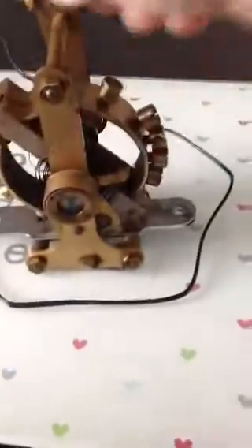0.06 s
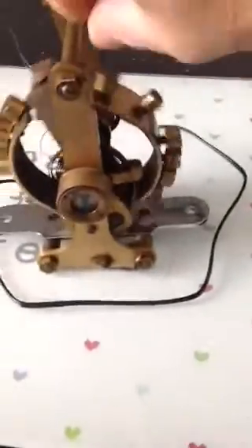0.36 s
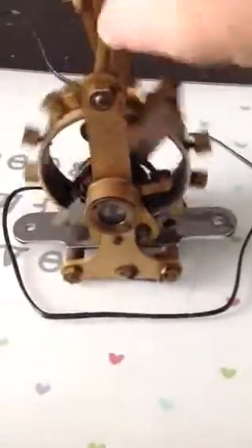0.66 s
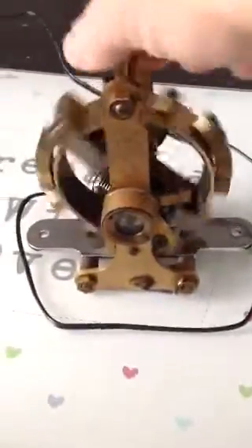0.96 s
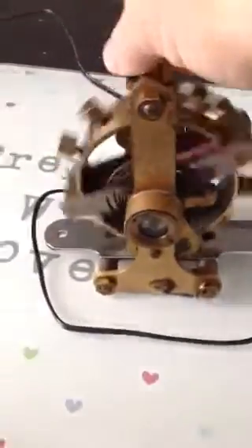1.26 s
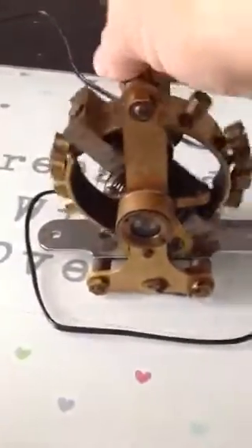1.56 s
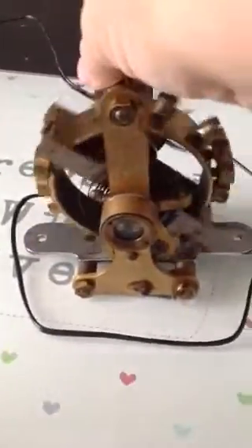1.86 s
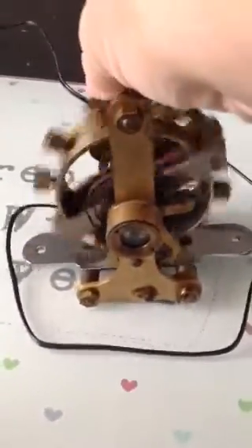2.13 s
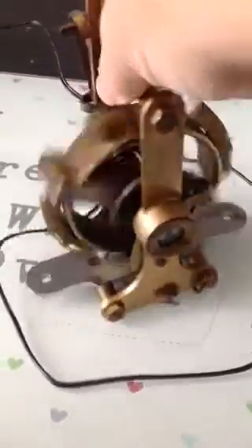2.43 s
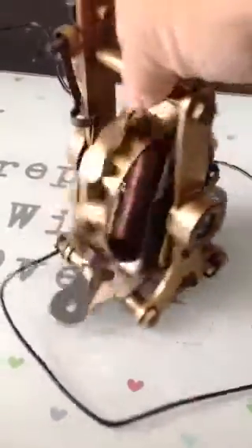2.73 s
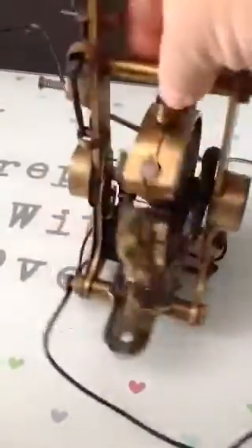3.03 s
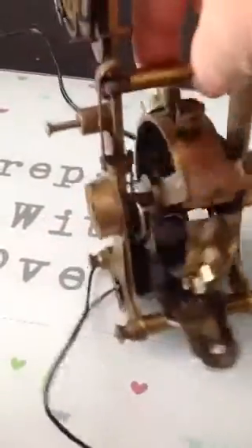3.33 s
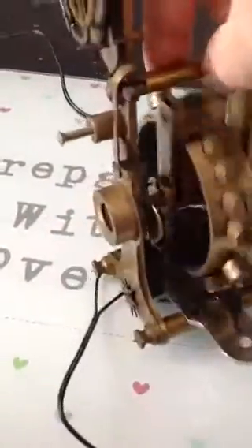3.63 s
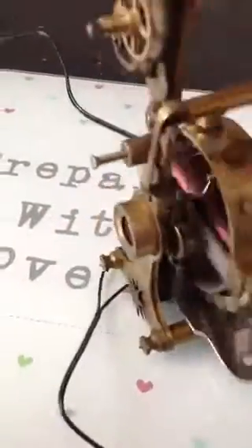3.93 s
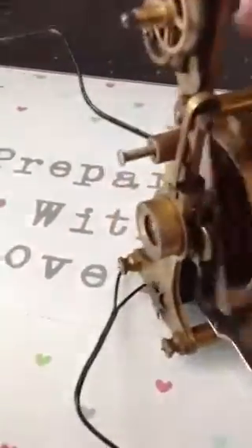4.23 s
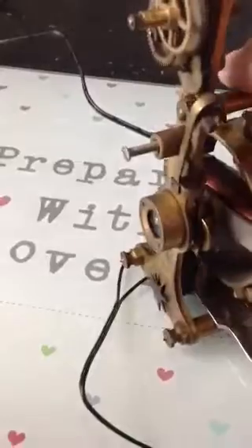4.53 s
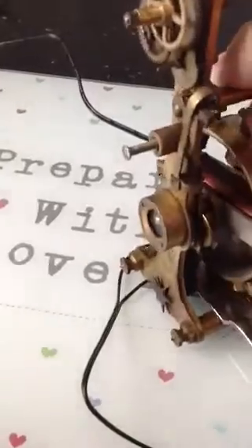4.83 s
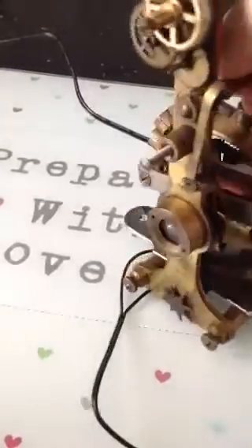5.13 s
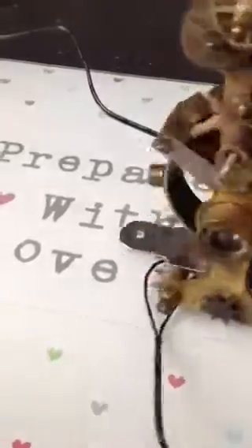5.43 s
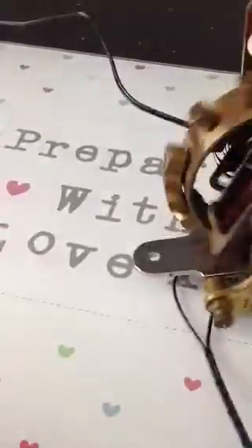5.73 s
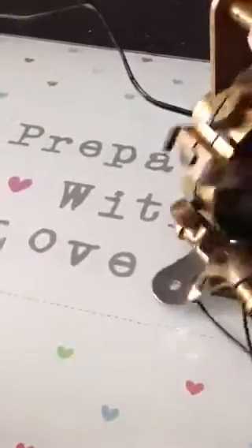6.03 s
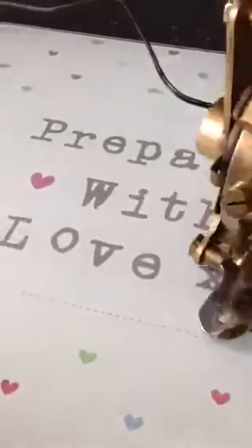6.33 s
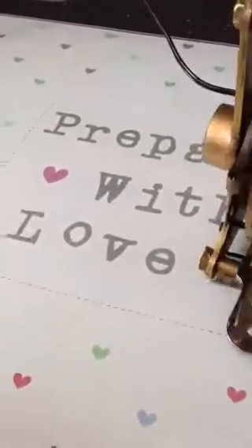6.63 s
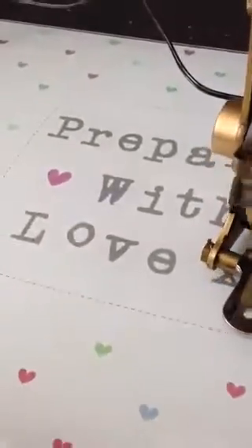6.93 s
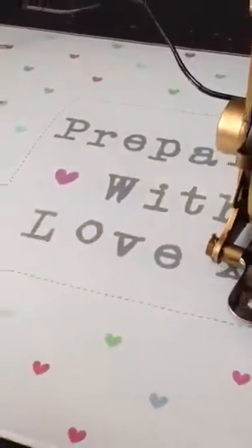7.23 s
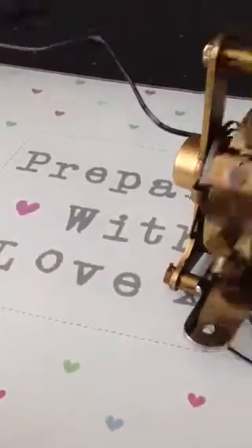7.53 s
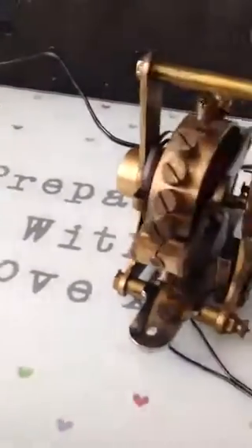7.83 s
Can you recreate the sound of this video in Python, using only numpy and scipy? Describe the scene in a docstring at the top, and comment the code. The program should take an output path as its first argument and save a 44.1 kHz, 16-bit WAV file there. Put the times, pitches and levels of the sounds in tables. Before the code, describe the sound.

Close to the microphone, a hand rocks and turns a brass clockwork, its feet knocking on the tabletop and its wheel striking the stops. The irregular knocks ring briefly and shake small loose parts, with soft ticks and faint rubbing between them. The loudest blow comes midway, then a rattling cluster, a short scrape and a last solid knock. A small room adds a slight echo and quiet hiss.

```python
"""Knocks and metallic rings: a brass clock movement is rocked and turned by hand on a table.
Its feet strike the top and its heavy balance wheel hits the stops; each blow rings frame and table
and shakes loose parts. Between blows, pivots and spring rub faintly and the feet drag.
A small room echoes the blows; low room noise and hiss lie underneath."""
import sys
import numpy as np
from scipy import signal
from scipy.fft import rfft, irfft
from scipy.io import wavfile

SR = 44100
rng = np.random.default_rng(int(sys.argv[2]) if len(sys.argv) > 2 else 0)


def file_out(sig):
    """Save sig as 16-bit WAV at sys.argv[1]."""
    # one column per channel
    cols = np.atleast_2d(sig).T
    # limit, then scale
    lim = np.clip(cols, -1, 1)
    pcm = np.round(lim * 32767).astype(np.int16)
    wavfile.write(sys.argv[1], SR, pcm)


N = 356328

# blows: t/s, body/dB (0.5-1.1 kHz), thud/dB re body, clank/dB re body, hardness/dB, rise/s,
# chatter/dB, ringing part, its level/dB re body
KNOCKS = [(1.0917, -42, -13, -5.5, -33, 0.00074, -21, "foot", 4),
          (2.2534, -66, -27, 3, 23, 0.0055, -37, "pin", 25),
          (2.337, -58.5, 4.5, -1.5, 22.5, 0.00024, -20, "post", 12),
          (2.7598, -41.5, -12, 3, -14, 0.001, -17, None, 0),
          (2.776, -48.5, 4, 8.5, 18, 0.00019, -2.5, "edge", 4),
          (3.275, -42.5, -18.5, -4, -2, 0.0013, -22, "bracket", 15),
          (3.354, -47.5, -5, 1, -6, 0.0011, -25, "strap", 11),
          (3.944, -23, -14.5, 7, 5.5, 0.00056, -22, "base", 2),
          (3.9625, -26, -7.5, 2.5, -17, 0.00063, -33, None, 0),
          (4.084, -43, -9, 11, -4, 0.00076, -36, None, 0),
          (5.593, -45.5, -5.5, 5, 13, .0022, -44, "board", 7),
          (5.7082, -52, 2, -18, 18, 0.0003, -32, None, 0),
          (5.827, -39, -4, -10.5, -16, .0019, -20, "screw", 5),
          (5.881, -38, -17, -6.5, -14, .0016, -18, None, 0),
          (5.8907, -42, 3, 11, -4, 0.00046, -31, "strap", 16.5),
          (5.9269, -54.5, 10, 13, 17.5, 0.0007, -19, "pawl", 21.5),
          (5.966, -48, -20, 5.5, -1.5, .0009, -1, None, 0),
          (6.1804, -49.5, -17, 0, -3.5, 0.0045, -16, "board", 8),
          (6.336, -47.5, 0, 4.5, -9.5, 0.0022, -3, "strap", 8.5),
          (6.9638, -31.5, -16.5, 3, 1.5, 0.00061, -40, "stop", 11)]
# light touches: t/s, body/dB, hardness/dB
TAPS = [(0.2883, -76.5, 28), (.831, -73.5, 5), (.958, -70, 0), (1.028, -69.5, 3), (1.078, -59, -19),
        (1.39, -71.5, 15.5), (1.502, -69.5, 17.5), (2.499, -63.5, 12.5), (2.7, -59, -36), (2.906, -57.5, 0),
        (3.162, -60.5, 2), (3.445, -62, -8), (3.603, -65, -10), (4.425, -69.5, 16), (5.226, -67.5, -12),
        (5.342, -65.5, 6.5), (5.546, -66, -8), (5.688, -62.5, 1), (5.862, -53, 3), (6.111, -55, -2.5),
        (7.436, -72, 17), (7.652, -67.5, 13.5), (7.768, -73, 18)]
# thud, body, clank, edge and click bands: low/Hz, high/Hz
BLOW_BANDS = [(100, 450), (500, 1100), (1200, 4500), (5000, 9000), (10000, 15000)]
# shift of the low frame modes as weight moves between the feet: t/s, detune/%
LOAD_DETUNE = [(1.1, 5), (2.7, 0.5), (3.3, -3.5), (3.95, .5), (5.6, 0.5), (5.9, -6.5), (6.3, -6), (7, 0.5)]
# modes of frame, wooden top, ringing parts (by name), washers: f/Hz, level/dB, nominal t60/s
FRAME_MODES = [(556.4, -10, 0.21), (665, -15, 0.068), (773, 3.5, .12), (852.6, 0.5, 0.11), (963, -20, 0.26),
               (1200, -2.5, .11), (1295, -9, 0.27), (1535, -9.5, 0.052), (1584, -9.5, 0.091),
               (1767, -7.5, 0.11), (2304, -3.5, 0.11), (2400, -13, 0.086), (2650, -9, 0.19),
               (3100, -19, 0.043), (3580, -1, 0.091), (3780, -8, 0.1), (4450, -0.5, 0.087),
               (5160, -9, 0.061), (6620, -9, 0.11), (5790, -13, 0.058), (7100, -18, 0.091),
               (7510, -13, 0.044), (7800, -7.5, 0.21), (10400, -15.5, 0.11), (11580, -17, .1)]
TABLE_MODES = [(239.7, -20.5, .22), (323, -9.5, 0.11), (352, -15.5, 0.037), (380, -18.5, .15),
               (465, -14, 0.078), (512, -15, .14)]
PART_MODES = {"base": [(153, -20.5, 0.65), (178, -17, 0.5), (340.5, -10.5, 0.24), (461, -12, .3),
              (541.6, -6, .2), (676, -5.5, 0.24), (772, -3, .22), (827.5, -1, 0.26), (1220, -3.5, 0.2),
              (1343, -1, .25), (1580, -5, .2), (1675, -3.5, .12), (1815, -3, .16), (6220, -2.5, 0.13)],
              "stop": [(128, -32, 0.43), (183, -26, .29), (328, -23, 0.24), (501, -19, .1),
              (824, -8, 0.023), (922, 3.5, 0.049), (977, -6.5, 0.14), (1660, -6.5, .052),
              (1760, 6.5, 0.022), (2375, -8.5, 0.06), (3460, 0.5, 0.022)], "foot": [(159.6, -6.5, .26),
              (234, -13, 0.14), (569, -3, .08), (850, 2.5, 0.15), (1260, 0, 0.043)],
              "bracket": [(803, -4.5, 0.061), (4470, -9, 0.053)], "strap": [(1294, 3, 0.042),
              (3630, -22, .055)], "screw": [(4270, 3, 0.029)], "pawl": [(4370, -13.5, 0.35),
              (7700, -2, .044), (9260, -6.5, .04)], "pin": [(3550, -6, 0.067), (4700, -7, 0.047),
              (8240, -10, .05), (10750, 0, .06)], "post": [(329, 0, 0.32), (2620, 7, .045)],
              "board": [(307, -3.5, 0.2)], "edge": [(210, -2, 0.48)]}
WASHER_MODES = [(1316, 2.5, .2), (1819, -1.5, .2), (2365, -3, .2), (2640, -3, .22), (3420, 0, .18),
                (4370, -0.5, .2), (6164, -2.5, .22), (7066, -4, .2), (7779, -6, .2), (9840, -8, .2)]
# dense unresolved plate modes: f/Hz, level/dB
WASH_SPECTRUM = [(40, -36), (100, -23), (200, -5), (430, -9), (620, -6), (800, 0), (1050, -5), (1350, -1),
                 (2050, -3), (2500, 0), (4400, -2.5), (5500, -4), (7500, -4), (15500, -15.5)]
# friction events: t/s, length/s, level/dB, part
RUBS = [(.33, 0.2, -72, "bearing"), (1.221, .26, -67, "wheel"), (2.86, 0.66, -70, "spring"),
        (2.94, .11, -62.5, "plate"), (4.185, 0.085, -59, "spring"), (4.186, 0.068, -60.5, "pivot"),
        (4.28, 0.32, -65.5, "wheel"), (5.78, .74, -55, "feet"), (6.5, 0.37, -67, "feet"),
        (6.46, 0.17, -63, "plate"), (3.151, .24, -66, "plate"), (6.63, .39, -69, "bearing"),
        (7.22, .4, -67, "pivot"), (7.415, .06, -59, "pivot")]
# friction resonances by part: f/Hz, width/Hz, level/dB
RUB_RESONANCES = {"wheel": [(1323, 48, -3.5), (2320, 300, -6), (4700, 280, -8), (8200, 300, -3),
                  (9200, 2600, -4.5)], "spring": [(6100, 700, -8), (7730, 380, 1.5), (9300, 2400, -5.5)],
                  "pivot": [(2220, 250, 0.5)], "bearing": [(2490, 240, -2)], "plate": [(793, 105, 2),
                  (2400, 1400, 1.5), (6600, 2100, -6)], "feet": [(155.4, 32, -6), (331, 41, -18)]}
# feet sliding, fingers brushing: t/s, level/dB
SLIDE_LEVEL = [(0.0, -68), (0.97, -68), (1.24, -65), (1.75, -67.5), (2.2, -66), (2.36, -62.5), (3.24, -61),
               (3.53, -68), (3.98, -67.5), (4.09, -57.5), (4.66, -67.5), (5.29, -66), (5.62, -63.5),
               (5.85, -63.5), (6.41, -59.5), (6.57, -64.5), (7.67, -65), (8.08, -67.5)]
# tone of the sliding: f/Hz, level/dB
SLIDE_SPECTRUM = [(80, 0.5), (155, 15), (230, 0), (320, 7), (500, 2), (1300, 1.5), (2500, 1), (4400, -0.5),
                  (7800, 0.5), (15500, 1)]
# room decay: f/Hz, t60/s
ROOM_T60 = [(100, 0.46), (300, 0.48), (800, 0.49), (2500, 0.4), (6000, 0.28), (15000, .25)]
# standing waves of the room: f/Hz, level/dB, nominal t60/s
ROOM_MODES = [(121.3, -9.5, .5), (150, -2, .55), (186, 4.5, 0.91), (340, -5, 0.54)]
# room noise and hiss: f/Hz, level/dB
NOISE_SPECTRUM = [(15, -54.5), (25, -32), (71, -27), (188, -3.5), (274, -8), (305, 0.5), (389, -10),
                  (445, -6.5), (871, -10.5), (970, -14.5), (1050, -13), (1850, -16.5), (2420, -17),
                  (3830, -19.5), (15500, -18)]
TOP_HZ = 15600


def knocks():
    """Feet land on the table; the wheel hits its stops."""
    out = np.zeros(N)
    for at_s, *blow, _, _ in KNOCKS:
        add(out, at_s, strike(at_s, *blow))
    return out


def taps():
    """Wheel and fingers touch the frame lightly; harder taps clank more."""
    out = np.zeros(N)
    for at_s, body_db, hardness_db in TAPS:
        tap = strike(at_s, body_db, thud_db=-19, clank_db=1 + 0.37 * hardness_db,
                     hardness_db=hardness_db, rise_s=0.00051, chatter_db=-7, size=12000)
        add(out, at_s, tap)
    return out


def strike(at_s, body_db, thud_db, clank_db, hardness_db, rise_s, chatter_db, size=30000, heavy_db=-23):
    """One blow, balanced by band over its first 30 ms. Hard: brief and bright. Heavy: longer."""
    crack_t60_s = .038 * (undb(-.08 * hardness_db) + undb(body_db - heavy_db)) + .15 * undb(chatter_db)
    detune_pct = np.interp(at_s, *np.transpose(LOAD_DETUNE))
    blow = impact(np.arange(size) / SR, crack_t60_s, rise_s, chatter_db, hardness_db, detune_pct)
    attack = blow[:int(.03 * SR)]
    attack_db = np.array([20 * np.log10(np.std(band(attack, lo, hi))) for lo, hi in BLOW_BANDS])
    edge_db, click_db = -5 + 0.49 * hardness_db, -14.5 + 1.02 * hardness_db
    gain_db = body_db + np.array([thud_db, 0, clank_db, edge_db, click_db]) - attack_db
    centres_hz = np.sqrt(np.prod(BLOW_BANDS, axis=1))
    return colour(blow, [*zip(centres_hz, gain_db), (TOP_HZ, gain_db[-1] - 4.5)])


def impact(t, crack_t60_s, rise_s, chatter_db, hardness_db, detune_pct, echo_db=-8):
    """Contact tick, plate crack, chatter of loose parts, frame and table modes, room echo."""
    tick_db, frame_db = 10 + 0.22 * hardness_db, -3 - 0.22 * hardness_db
    grains = noise(len(t)) * undb(11 * noise(len(t)))
    tick = undb(tick_db) * unit(band(noise(len(t)), 4200, 15000, order=1)) * fade(t, t60_s=0.004)
    crack = unit(colour(noise(len(t)), WASH_SPECTRUM)) * fade(t, crack_t60_s)
    chatter = undb(chatter_db) * through_frame(grains, frame_db - 5) * fade(t, t60_s=0.38)
    t60_scale = (min(crack_t60_s, .1) / 0.17) ** 0.71  # a firm grip damps crack and frame alike
    frame = undb(frame_db) * ring(FRAME_MODES, t, t60_scale, scatter_db=6, detune_pct=detune_pct)
    table = undb(-1) * ring(TABLE_MODES, t, t60_scale=0.99, scatter_db=1)
    clatter = tick + undb(4) * (crack + chatter) + table
    onset = 1 - np.exp(-t / rise_s)
    # the thin frame feeds the room less than the broad table top
    echo = room_echo(onset * (clatter + undb(-5) * frame))
    return onset * (clatter + frame) + undb(echo_db) * echo


def pings(size=20000, buzz_depth=0.015, echo_db=-13, lag_s=0.001435):
    """The part nearest a blow rings on, low modes building last; buzz in its seat blurs high modes."""
    out, t = np.zeros(N), np.arange(size) / SR
    for at_s, body_db, *_, part, part_db in KNOCKS:
        if part:
            ping = 0
            for hz, db, t60_s in PART_MODES[part]:
                buzz = buzz_depth * drift(rate_hz=400)[:size] * (hz > 2000)
                tone = np.sin(2 * np.pi * hz * np.cumsum(1 + buzz) / SR)
                onset = 1 - np.exp(-t * hz)
                ping += undb(db) * tone * onset * fade(t, t60_s)
            add(out, at_s + lag_s, undb(body_db + part_db) * (ping + undb(echo_db) * room_echo(ping)))
    return out


def washers(bounce_hz=70, gain_db=-9, settle_t60_s=.5, size=9000):
    """Jolts set loose washers bouncing at random, ever more weakly."""
    t, shake = np.arange(N) / SR, np.zeros(N)
    for at_s, body_db, *_, chatter_db, _, _ in KNOCKS:
        add(shake, at_s, undb(body_db + chatter_db) * fade(t[:SR], settle_t60_s))
    out = 0
    for hz, db, t60_s in WASHER_MODES:
        bounces = (rng.random(N) < bounce_hz / SR) * noise(N) * np.sqrt(SR / bounce_hz)
        tone = ring([(hz, db, t60_s)], t[:size], t60_scale=1, scatter_db=0)
        out += undb(db) * signal.oaconvolve(bounces * shake, tone / np.linalg.norm(tone))[:N]
    return undb(gain_db) * out / np.sqrt(len(WASHER_MODES))


def rubs(catch_db=2, flutter_hz=48, flutter_depth=0.44):
    """Friction excites a part's resonances, catching and slipping in an uneven flutter."""
    cycles = np.cumsum(flutter_hz * (1 + 0.107 * drift(rate_hz=8.9))) / SR
    flutter = undb(catch_db * drift(rate_hz=44)) * (1 + flutter_depth * np.sin(2 * np.pi * cycles))
    out = np.zeros(N)
    for at_s, length_s, rub_db, part in RUBS:
        n = int(length_s * SR)
        for hz, width_hz, db in RUB_RESONANCES[part]:
            rub = band(noise(2 * SR), hz - width_hz / 2, hz + width_hz / 2, order=2)[-n:]
            if width_hz > 3 * flutter_hz:  # only wide resonances follow the flutter
                rub *= flutter[int(at_s * SR):][:n]
            add(out, at_s, undb(rub_db + db) * unit(rub) * signal.windows.tukey(n, .8))
    return out


def slide(grain_db=5, uneven_db=2, rest_db=-68.5, gain_db=-0.5):
    """Dense tiny slips of the feet, in uneven pushes, shake the frame."""
    slips = noise(N) * undb(grain_db * np.repeat(noise(N), 16)[:N])
    level_db = np.interp(np.arange(N) / SR, *np.transpose(SLIDE_LEVEL))
    slip_power = np.maximum(undb(level_db) ** 2 - undb(rest_db) ** 2, 0)
    push = np.sqrt(slip_power) * undb(gain_db + uneven_db * drift(rate_hz=35))
    return unit(colour(through_frame(slips, modes_db=-5), SLIDE_SPECTRUM)) * push


def through_frame(contacts, modes_db, size=8000):
    """Tiny contacts heard through the plate wash and the frame and table modes."""
    response = ring(FRAME_MODES + TABLE_MODES, np.arange(size) / SR, t60_scale=.6, scatter_db=-3.5)
    wash = unit(colour(contacts, WASH_SPECTRUM))
    ringing = unit(signal.fftconvolve(contacts, response)[:len(contacts)])
    return unit(wash + undb(modes_db) * ringing)


def room_echo(x, first_wall_s=.004, build_s=0.0072, standing_db=-58):
    """Diffuse tail, dying sooner in the treble, plus standing waves."""
    n = len(x)
    t, hz = np.arange(n) / SR, np.fft.rfftfreq(n, 1 / SR)
    spectrum = rfft(noise(n))
    octave = np.round(np.log2(np.maximum(hz, 64)))
    tail = sum(irfft(spectrum * (octave == k), n) * fade(t, on_log(2 ** k, ROOM_T60))
               for k in np.unique(octave))
    tail *= np.clip((t - first_wall_s) / build_s, 0, 1)
    standing = undb(standing_db) * ring(ROOM_MODES, t, t60_scale=0.94, scatter_db=5)
    return signal.fftconvolve(x, tail / np.linalg.norm(tail) + standing)[:n]


def room_noise(level_db=-64):
    """Low room noise and steady hiss."""
    return unit(colour(noise(N), NOISE_SPECTRUM)) * undb(level_db)


def ring(modes, t, t60_scale, scatter_db, detune_pct=0):
    """Decaying modes, random in level, sign and fine pitch; detuning acts below 1 kHz."""
    out = 0
    for hz, db, t60_s in modes:
        level_draw, pitch_draw, sign_draw = noise(3)
        hz *= 1 + .002 * pitch_draw + detune_pct / 100 * (hz < 1000)
        gain = undb(db + scatter_db * level_draw) * np.sign(sign_draw)
        out += gain * np.sin(2 * np.pi * hz * t) * fade(t, t60_s * t60_scale)
    return out


def colour(x, points, size=4096):
    """Minimum-phase filter through points: f/Hz, gain/dB."""
    gain = undb(on_log(np.fft.rfftfreq(size, 1 / SR), points))
    cepstrum = irfft(np.log(gain))
    cepstrum[1:size // 2] *= 2
    cepstrum[size // 2 + 1:] = 0
    return signal.fftconvolve(x, irfft(np.exp(rfft(cepstrum))))[:len(x)]


def band(x, lo_hz, hi_hz, order=3):
    """Band-pass."""
    return signal.sosfilt(signal.butter(order, [lo_hz, hi_hz], "band", fs=SR, output="sos"), x)


def on_log(hz, points):
    """Interpolate over log frequency."""
    points_hz, values = np.transpose(points)
    return np.interp(np.log(hz + 1), np.log(points_hz), values)


def drift(rate_hz):
    """Smooth random drift, rms 1."""
    knots = np.arange(int(N / SR * rate_hz) + 2)
    return unit(np.interp(np.arange(N) / SR * rate_hz, knots, noise(len(knots))))


def noise(n):
    """White Gaussian noise."""
    return rng.standard_normal(n)


def fade(t, t60_s):
    """Exponential decay."""
    return undb(-60 * t / t60_s)


def undb(db):
    """Decibels to gain."""
    return 10 ** (np.asarray(db) / 20)


def unit(x):
    """Scale to rms 1."""
    return x / np.sqrt(np.mean(x ** 2))


def add(out, at_s, x):
    """Mix x into out."""
    start = int(at_s * SR)
    out[start:start + len(x)] += x[:len(out) - start]


def scene():
    """Close, mono; the movement's sounds are cut below about 110 Hz and lie over steady room noise."""
    movement = knocks() + taps() + pings() + washers() + rubs() + slide()
    return (band(movement, 112, 20000, order=4) + room_noise())[None]


def record(dry, ceiling=1.7):
    """Soft peak limit, then a steep low-pass."""
    lowpass = signal.ellip(10, .2, 70, TOP_HZ, fs=SR, output="sos")
    return signal.sosfilt(lowpass, ceiling * np.tanh(dry / ceiling))


dry = scene()
out = record(dry)
file_out(out)
```